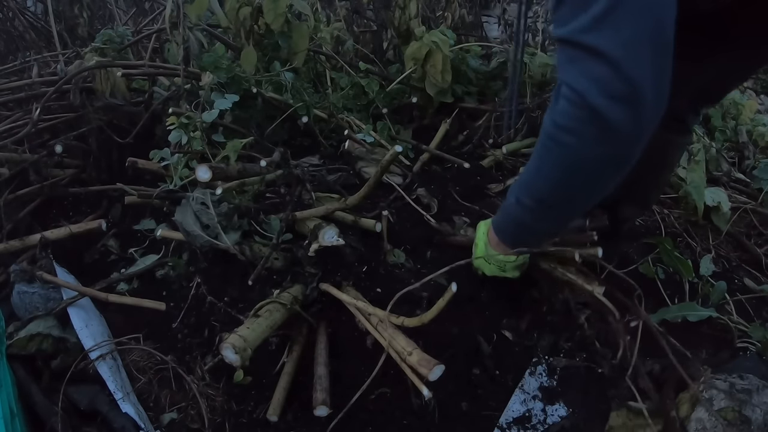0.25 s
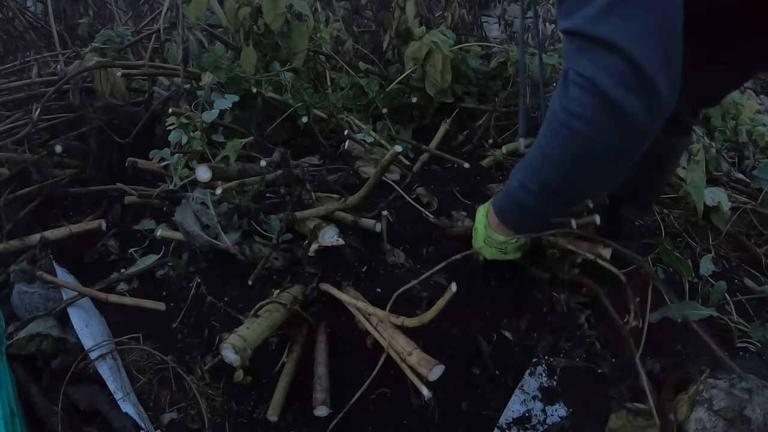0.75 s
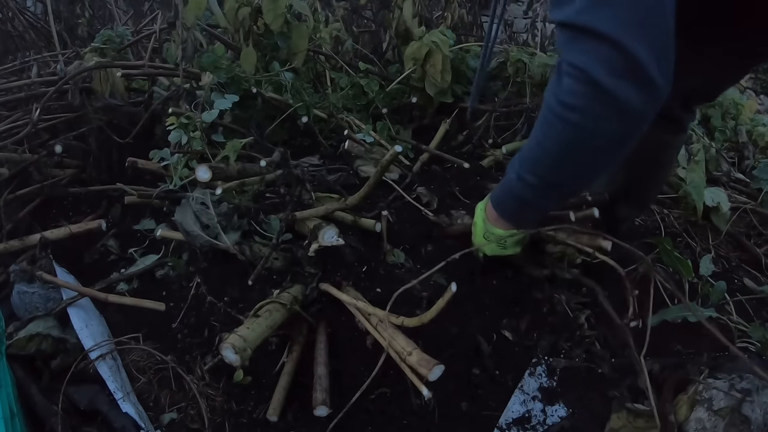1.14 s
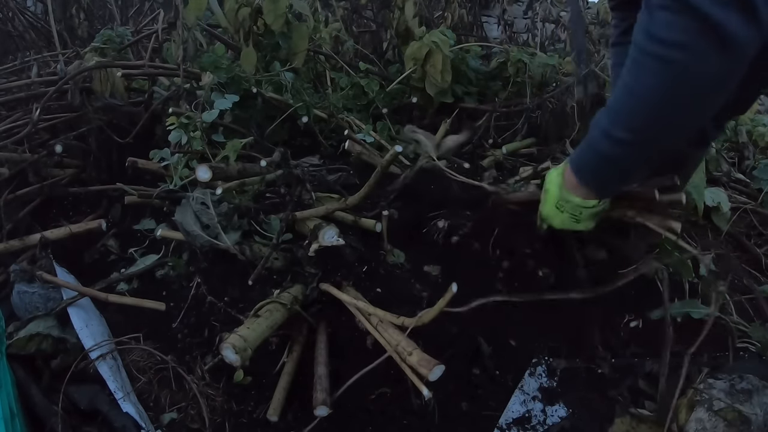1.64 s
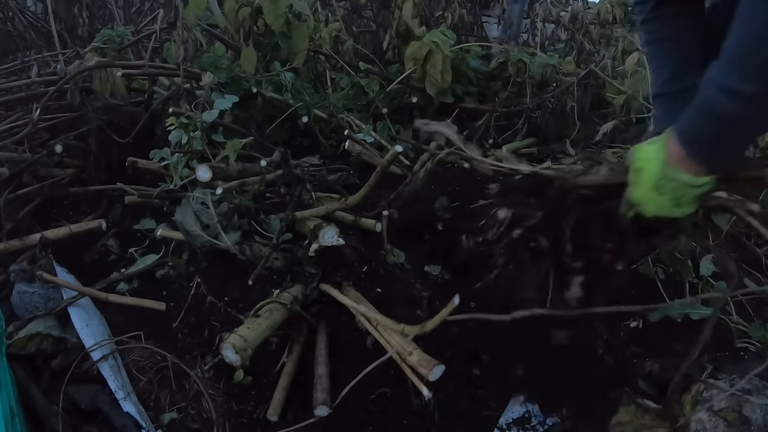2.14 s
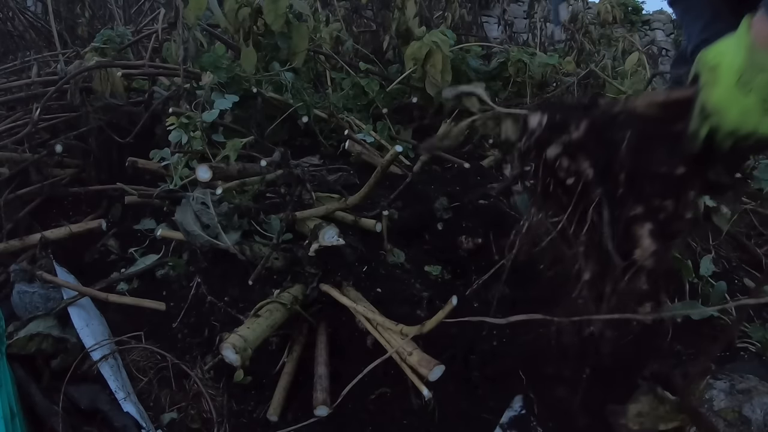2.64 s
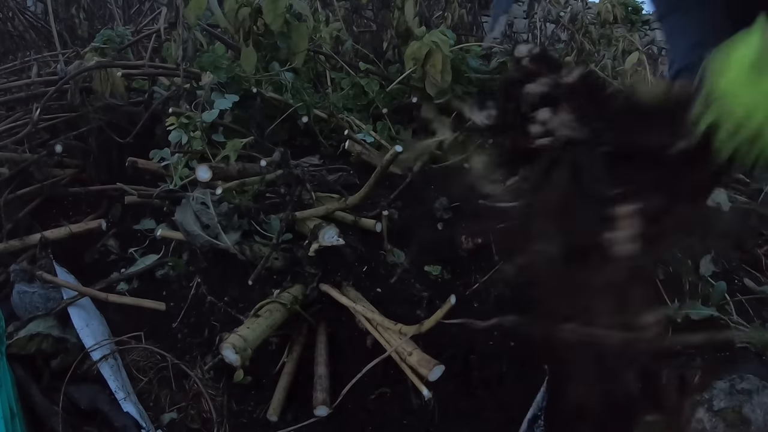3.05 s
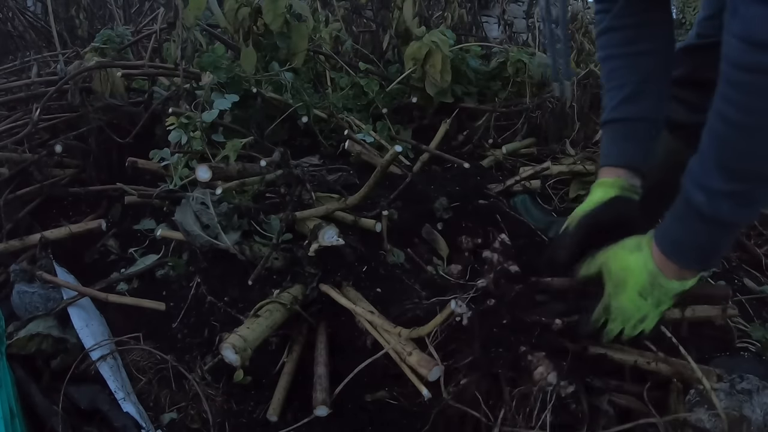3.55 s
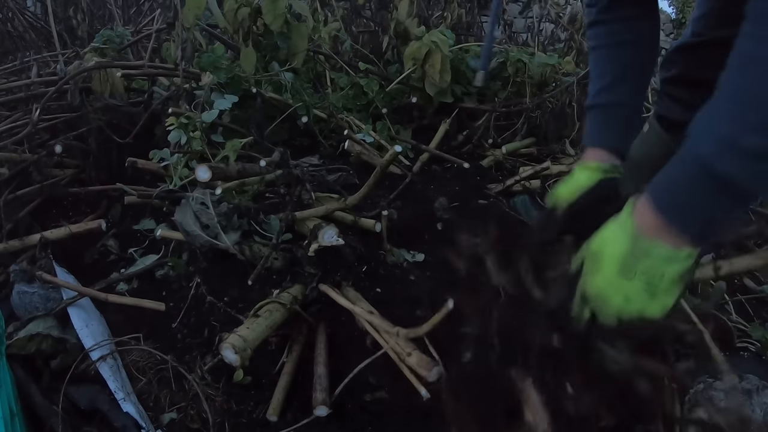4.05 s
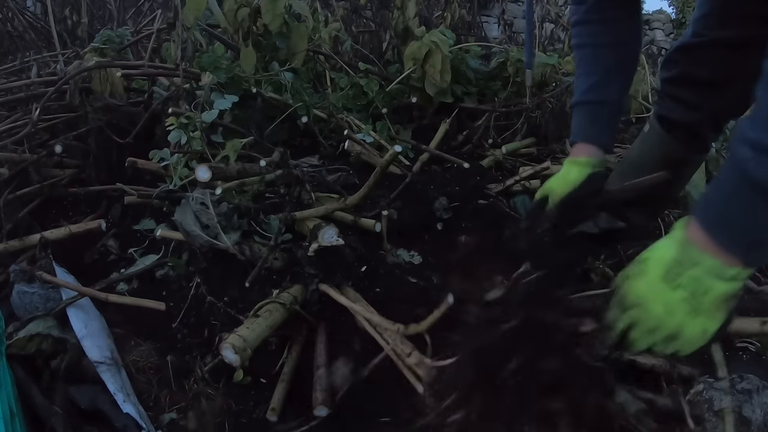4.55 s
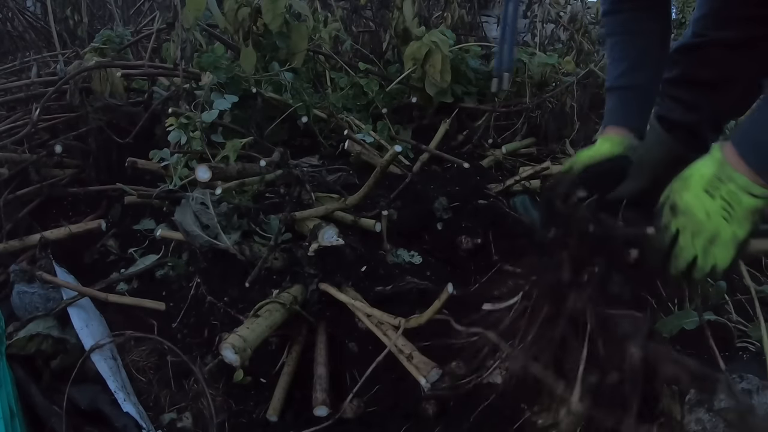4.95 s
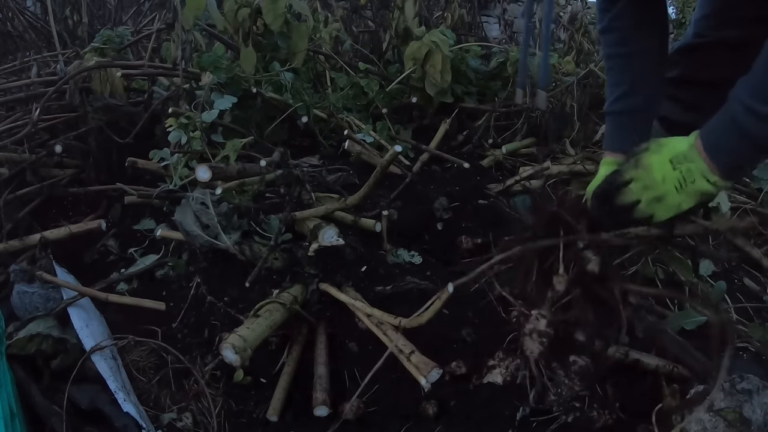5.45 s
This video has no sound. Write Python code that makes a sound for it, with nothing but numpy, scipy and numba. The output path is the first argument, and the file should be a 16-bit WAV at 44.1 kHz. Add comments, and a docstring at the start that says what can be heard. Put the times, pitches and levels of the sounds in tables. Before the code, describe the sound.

Close outdoor garden sound, almost mono. Gloved hands tug at dry stalks with small snaps and fine crackle, then harder cracks just after one second. One very sharp snap precedes a dense ripping of roots. After a short lull, the clump is shaken with rattling, crumbling soil and soft thuds, fading as a distant motor hum rises over light breeze and faint hiss.

```python
"""Gloved hands tug a clump of dry stalks, tear its roots from garden soil and shake the earth off.
Small snaps and crackle come first, hard cracks near 1.3 s, the sharpest at 2.8 s, a dense tear near 3.2 s;
after a lull the shaking rattles from 4.2 s, then fades while a far motor swells from 5 s. Light breeze, hiss.
Breaks are kicked resonances with noise tails, the motor is a sum of sines, air and breeze are filtered noise.
The microphone is close and almost mono."""
import sys
import numpy as np
from scipy import signal
from scipy.io import wavfile
from scipy.ndimage import uniform_filter1d
from numba import njit

SR = 44100
rng = np.random.default_rng(int(sys.argv[2]) if len(sys.argv) > 2 else 0)


def persist_wave(psi):
    """Save psi, clipped to +-1, as 16-bit WAV."""
    counts = np.round(np.clip(psi, -1, 1) * 32767).astype(np.int16)
    wavfile.write(sys.argv[1], SR, np.atleast_2d(counts).T)


N = 250929


def undb(db):
    """Amplitude factor of a level in dB."""
    return 10 ** (np.asarray(db) / 20)


def level(x, rms_db):
    """Scale x to an RMS level."""
    return x * undb(rms_db) / np.sqrt(np.mean(x ** 2))


def curve(table):
    """Interpolate each column of a table over time."""
    time_s, *columns = np.transpose(table)
    return [np.interp(np.arange(N) / SR, time_s, c) for c in columns]


def band(x, lo_hz, hi_hz):
    """Second-order Butterworth band-pass."""
    return signal.sosfilt(signal.butter(2, [lo_hz, hi_hz], "bandpass", fs=SR, output="sos"), x)


def walk(rate_hz):
    """Random levels held 1 / rate_hz s and slewed twice; spread near 1."""
    hold = int(SR / rate_hz)
    steps = np.repeat(rng.standard_normal(N // hold + 1), hold)
    slewed = uniform_filter1d(uniform_filter1d(steps, hold), hold)
    return 1.35 * slewed[:N]


@njit
def bursts(noise, start, hz, damp, tail_s, tail, peak):
    """A kick and a dying noise spray through two damped band-pass resonances, scaled to its peak."""
    out, burst = np.zeros(len(noise)), np.empty(4096)
    for e in range(len(start)):
        g = np.tan(np.pi * hz[e] / SR)
        scale = 1 + g * (g + damp)
        fall = np.exp(-np.log(1000.) / (tail_s[e] * SR))  # -60 dB in tail_s
        n = min(4096, int(tail_s[e] * SR + 4 * SR / (hz[e] * damp)), len(noise) - start[e])
        # band and low states of the two filters
        band1, low1, band2, low2 = 0., 0., 0., 0.
        spray, top = tail, 1e-9
        for i in range(n):
            x = spray * noise[start[e] + i] + (1. if i == 0 else 0.)
            v = (band1 + g * (x - low1)) / scale
            w = (band2 + g * (v - low2)) / scale
            band1, low1 = 2 * v - band1, low1 + 2 * g * v
            band2, low2 = 2 * w - band2, low2 + 2 * g * w
            spray *= fall
            burst[i] = w
            top = max(top, abs(w))
        for i in range(n):
            out[start[e] + i] += burst[i] * peak[e] / top
    return out


def strike(time_s, hz, damp, tail_s, tail, peak_db):
    """Breaks at time_s; damp = 1 / Q of each resonance, tail = spray amplitude against the kick."""
    time_s = np.asarray(time_s)
    tail_s = np.clip(tail_s + 0 * time_s, .001, .08)
    start = np.clip(time_s * SR, 0, N - 1).astype(np.int64)
    hz = np.clip(hz + 0 * time_s, 40, 15000)
    peak = undb(peak_db + 0 * time_s)
    return bursts(rng.standard_normal(N), start, hz, 1. * damp, tail_s, 1. * tail, peak)


# spectrum of the hiss: (frequency [Hz], relative density [dB per Hz])
AIR_SPECTRUM = [(47, -31), (80, 0), (130, 2.5), (178, -7), (361, -13.5), (802, -11), (1020, -16),
                (2380, -18), (10700, -29), (16000, -30)]
AIR_RMS_DB = -63


def air():
    """Distant hiss: half-octave noise bands, each flickering a little."""
    out = 0
    table_hz, table_db = np.transpose(AIR_SPECTRUM)
    for hz in 88 * 2 ** np.arange(0, 7.6, .5):
        db = np.interp(np.log(hz), np.log(table_hz), table_db) + 1.2 * walk(6)
        noise = band(rng.standard_normal(N), hz / 2 ** .25, hz * 2 ** .25)
        out = out + undb(db) * noise
    return level(out, AIR_RMS_DB)


# breeze on the microphone: (time [s], level [dB])
BREEZE_LEVEL = [(0.0, -55), (1.06, -57.5), (1.39, -52), (2.59, -60), (3.26, -50), (3.48, -58.5),
                (4.49, -53), (4.86, -56), (5.69, -57.5)]


def breeze():
    """Low buffeting of moving air: low-band noise with a wandering level."""
    gusts = band(band(rng.standard_normal(N), 26.6, 143), 23.5, 83)
    gust_db = curve(BREEZE_LEVEL)[0] + 0.99 * walk(9.9)
    return undb(gust_db) * level(gusts, 0)


# far motor: (time [s], firing rate [Hz], level [dB])
MOTOR_RUN = [(0, 118, -65), (1.2, 116.3, -77), (4.9, 116.5, -69), (5.15, 112.6, -58), (5.4, 114.7, -59),
             (5.69, 119.7, -58)]
# its partials: (multiple of firing rate [1], relative level [dB])
MOTOR_PARTIALS = [(1, -2), (5.5, -13), (9, -10.5), (12, -16), (14.5, -18.5), (21, -16), (26, -29)]


def motor():
    """Wavering firing tone with a few thin overtones."""
    hz, db = curve(MOTOR_RUN)
    phase = 2 * np.pi * np.cumsum(hz * (1 + 0.00555 * walk(3.8))) / SR
    tone = sum(undb(d + 2.0 * walk(9)) * np.sin(k * phase) for k, d in MOTOR_PARTIALS)
    return undb(db) * tone


# clods and root ball on the ground: (time [s], peak before band-pass [dB], pitch [Hz])
CLOD_THUDS = [(0.35, -38, 414), (0.399, -34, 650), (0.423, -37.5, 610), (0.61, -33, 515),
              (0.713, -36.5, 206), (1.059, -43, 387), (1.133, -40.5, 237), (1.195, -41.5, 350),
              (1.278, -33.5, 196), (1.36, -34, 145), (1.397, -35.5, 228), (1.852, -37.5, 294),
              (2.195, -33, 460), (2.318, -28, 534), (2.742, -32.5, 487), (2.922, -35.5, 101),
              (3.003, -31.5, 175), (3.137, -23.5, 397), (3.177, -34, 119), (3.232, -33, 171),
              (3.266, -33.5, 138), (3.639, -48, 450), (3.8, -35.5, 565), (4.216, -33, 146),
              (4.428, -29, 740), (4.487, -28, 230), (4.546, -36.5, 360), (4.69, -22.5, 694),
              (4.7, -26, 420), (4.88, -33.5, 400), (4.955, -29, 370)]


def thuds():
    """Soft blows on loose earth: one or two clean low cycles."""
    time_s, peak_db, hz = np.transpose(CLOD_THUDS)
    blows = strike(time_s, hz, 1.0, 0.035, 0.029, peak_db)
    return band(blows, 46, 1300)


def grit(db, count, hz, octaves, damp, tail_s, scatter_db, full_db, clump_db):
    """Tiny breaks, fewer below full_db; scatter_db > 0 lifts a few grains, < 0 sinks a few."""
    when, tone, size, keep = rng.random((count, 4)).T
    share = np.clip(undb(.8 * (db - full_db)), .06, 1)
    here = share[(when * N).astype(int)]
    size_db = np.where(keep < here, -scatter_db * np.log(1 - size), -60)
    pitch_hz = hz * 2 ** (octaves * (2 * tone - 1))
    grains = strike(when * N / SR, pitch_hz, damp, tail_s, 0.25, size_db)
    return undb(db) * level(grains * undb(clump_db) / np.sqrt(share), 0)


# the tug, also drives the twigs: (time [s], fibre crackle level [dB], dry leaf level [dB])
TUG_EFFORT = [(0.0, -61, -70), (0.18, -67.5, -75), (0.37, -56.5, -62), (0.53, -66, -75), (0.64, -58, -75),
              (0.95, -65, -73), (1.28, -55.5, -74), (1.4, -44, -54), (1.65, -47.5, -61.5), (1.92, -51, -68),
              (2.08, -64.5, -63.5), (2.3, -49, -58), (2.47, -55.5, -67), (2.74, -47.5, -57),
              (2.83, -49.5, -61), (2.98, -43, -53), (3.11, -46.5, -65), (3.22, -39, -44),
              (3.33, -46.5, -48.5), (3.47, -66, -61.5), (3.6, -56.5, -64), (3.98, -58, -57.5),
              (4.21, -44.5, -48.5), (4.25, -44.5, -48), (4.285, -52.5, -53), (4.34, -45.5, -52.5),
              (4.42, -45.5, -50), (4.67, -41.5, -53.5), (4.87, -46, -62), (5.1, -58.5, -66),
              (5.69, -68, -70)]
# soil grows faster than the fibres: level at the pivot, dB per fibre dB, fibre level at the pivot
SOIL_DB, SOIL_GROWTH, SOIL_PIVOT_DB = -54.5, 1.06, -49.5
SHAKE_S, SHAKE_DB = 4.6, 3  # extra soil from the last shake on


def crackle():
    """Stalk fibres, crumbling soil and dry leaves, bunched by the same slips of the grip."""
    fibre_db, leaf_db = curve(TUG_EFFORT)
    shake_db = SHAKE_DB * (np.arange(N) > SHAKE_S * SR)
    soil_db = SOIL_DB + shake_db + SOIL_GROWTH * (fibre_db - SOIL_PIVOT_DB)
    slip = walk(90)
    fibres = grit(fibre_db, count=9000, hz=2200, octaves=1.33, damp=0.9, tail_s=0.0086,
                  scatter_db=1.68, full_db=-44.5, clump_db=1.5 * slip)
    soil = grit(soil_db, count=4000, hz=456, octaves=1.135, damp=1.0, tail_s=0.0092,
                scatter_db=-3.0, full_db=-53, clump_db=3.5 * slip)
    leaves = grit(leaf_db, count=12000, hz=6000, octaves=1.0, damp=1.3, tail_s=0.021,
                  scatter_db=1.0, full_db=-69.5, clump_db=1.6 * slip)
    return fibres + soil + leaves


TWIG_DB, TWIG_SCATTER_DB = 13, 1.5  # peak over the fibre crackle
TWIG_HZ, TWIG_CRACK_DB, TWIG_TAIL_S = 2200, -27, 0.0093  # centres of the random draws
TEAR_S, STRAIN_DB = 1.5, 6  # louder while the roots still hold
DOWN_S, REST_DB = 4.6, -8  # quieter once the clump is put down


def twigs(count):
    """Small twigs break at random, as loud as the tug allows; columns as in STALK_SNAPS."""
    when, size = rng.random((count, 2)).T
    pitch, bright, length = rng.standard_normal((count, 3)).T
    time_s = when * N / SR
    fibre_db = curve(TUG_EFFORT)[0][(when * N).astype(int)]
    stage_db = np.where(time_s < TEAR_S, STRAIN_DB, np.where(time_s > DOWN_S, REST_DB, 0))
    peak_db = fibre_db + TWIG_DB - TWIG_SCATTER_DB * np.log(1 - size) + stage_db
    hz = TWIG_HZ * 2 ** (0.49 * pitch)
    crack_db = TWIG_CRACK_DB + 6 * bright
    tail_s = TWIG_TAIL_S * 2 ** (0.3 * length)
    return np.array([time_s, peak_db, hz, crack_db, tail_s])


# loudest snaps of stalks and roots:
# (time [s], ring peak [dB], ring pitch [Hz], crack relative to ring [dB], ring splinter tail [s])
STALK_SNAPS = [(0.0184, -37, 3310, -14, 0.0044), (0.0441, -28.5, 1250, -16, 0.002),
               (0.0766, -36.5, 1370, -27, .004), (0.1337, -36.5, 3110, -22, 0.0061),
               (0.1573, -40.5, 2150, -1, .004), (0.169, -36.5, 1990, -14, 0.0087),
               (0.2186, -39.5, 2800, -23, 0.0097), (0.2395, -41, 1950, -21, 0.0097),
               (0.2919, -35.5, 1410, -10, 0.0043), (0.3208, -36.5, 2610, -6, 0.0081),
               (0.349, -33.5, 2160, -23, 0.0086), (0.4086, -29.5, 1560, -35, .009),
               (0.4402, -33, 3710, -13, 0.0048), (0.5658, -37.5, 3830, -13, 0.0049),
               (0.5831, -25, 2400, -33, 0.001), (0.6094, -30, 1850, -8, .003),
               (0.622, -26.5, 1700, -23, 0.0048), (0.6284, -34, 2980, -9, 0.004),
               (0.689, -33, 3370, -20, 0.0039), (0.6962, -33.5, 3580, -25, 0.0071),
               (0.7094, -29.5, 2370, -22, 0.011), (0.7192, -28, 1680, -22, 0.002),
               (0.7519, -36, 3080, -23, 0.0039), (0.759, -25, 2420, -10, 0.0029),
               (0.778, -34, 1970, -23, 0.005), (0.7892, -33, 2550, -15, 0.0062),
               (0.7964, -32.5, 1360, -19, 0.0068), (0.8403, -30.5, 2220, -28, 0.0039),
               (0.863, -31.5, 2020, -32, .004), (0.881, -40.5, 4500, -14, 0.0028),
               (0.927, -31, 2540, -20, 0.0042), (1.0001, -30.5, 2280, -36, 0.0062),
               (1.021, -35, 3200, -24, 0.0057), (1.0599, -40, 1920, -18, 0.0032),
               (1.0793, -37, 2550, -19, 0.0033), (1.099, -34.5, 1430, -25, 0.0085),
               (1.1241, -23, 5060, -27, .004), (1.1302, -27, 1450, -9, 0.015),
               (1.184, -34, 1410, -29, 0.006), (1.1925, -26, 1680, -35, 0.0029),
               (1.2149, -39, 2320, -14, .004), (1.2317, -27.5, 2260, -22, 0.0016),
               (1.275, -14, 2500, -38, 0.0017), (1.3189, -33, 2500, -2, 0.0053),
               (1.324, -26, 1300, -29, .0076), (1.3526, -12.5, 2800, -8, 0.0033),
               (1.3607, -17.5, 2350, -13, 0.016), (1.381, -25, 3710, -23, 0.0036),
               (1.39, -26, 1810, -16, 0.0054), (1.397, -19.5, 1960, -6, 0.012),
               (1.4194, -16.5, 2870, -2, 0.0038), (1.4342, -36.5, 2240, 15, 0.01),
               (1.4427, -23, 1380, -21, 0.0066), (1.4495, -22.5, 2300, -3, 0.004),
               (1.4698, -24, 2860, -21, 0.0029), (1.545, -30, 2140, -10, .012),
               (1.5902, -27, 1560, -12, 0.0019), (1.6093, -27.5, 1497, -26, 0.0075),
               (1.6649, -27.5, 3060, -11, .005), (1.7003, -43, 3060, -19, 0.0029),
               (1.765, -26, 2170, -25, .006), (1.792, -26.5, 3500, -3, 0.016),
               (1.8116, -35.5, 4500, -2, .006), (1.8507, -24.5, 1900, -15, 0.0057),
               (1.911, -32, 1580, -10, 0.0044), (1.967, -28, 2380, -8.5, 0.0068),
               (1.9894, -26, 2310, -8, 0.0041), (2.0067, -28.5, 2300, -36, 0.00087),
               (2.0519, -36.5, 4800, 2.5, 0.013), (2.1773, -38.5, 4150, 1.5, 0.0092),
               (2.238, -32, 3740, -27, 0.011), (2.3194, -35, 1660, -19, 0.013),
               (2.3538, -27, 1980, -20, 0.0059), (2.4407, -35.5, 3410, -24, 0.0042),
               (2.543, -38.5, 4800, 2, 0.017), (2.576, -34, 1640, -24, .012),
               (2.5984, -39, 1690, -14, .003), (2.6204, -36, 1800, -16, .009),
               (2.6789, -36, 3400, -10, .0055), (2.7431, -25.5, 1900, -6, 0.011),
               (2.7655, -4.5, 3960, -8, 0.0027), (2.8104, -29, 1650, -25, 0.0044),
               (2.826, -28.5, 2170, -7, .01), (2.8537, -31, 3460, -19, 0.005),
               (2.865, -32, 2410, -10, 0.019), (2.894, -28.5, 3600, -5, 0.013),
               (2.9325, -30.5, 1450, -27, 0.0093), (2.9828, -23, 1830, -11, 0.012),
               (2.995, -30, 1920, -15, 0.026), (3.0288, -29.5, 1200, -20, 0.0067),
               (3.048, -29.5, 1090, -22, .006), (3.1141, -34, 1470, -24, .005),
               (3.1384, -23, 1650, -13.5, 0.053), (3.1526, -21.5, 2930, -25, 0.0086),
               (3.1744, -20, 2700, -14, 0.033), (3.219, -20, 3520, -15, 0.016),
               (3.246, -23.5, 2200, -16, 0.028), (3.3257, -25.5, 4110, -12, 0.0049),
               (3.3428, -25, 2380, -10, 0.0018), (3.388, -33, 1900, -18, 0.0036),
               (3.4467, -41, 1820, -25, 0.012), (3.6387, -36.5, 1780, -15, 0.0077),
               (3.6716, -39, 2970, -14, 0.0027), (3.688, -43.5, 1200, -16, .008),
               (3.7753, -35, 2000, -13, 0.0091), (3.8701, -40, 1950, -6, .012),
               (4.0303, -27.5, 3430, -5, 0.0056), (4.1674, -28.5, 2200, -21, 0.02),
               (4.2154, -21, 2030, -2.5, 0.011), (4.229, -25, 3420, -9, 0.02), (4.242, -30, 3120, 1, .0075),
               (4.3402, -27, 2240, -27, 0.0069), (4.3737, -35, 3160, 8, 0.043),
               (4.412, -23, 2110, -13, 0.0055), (4.4414, -28, 3390, -17, .01),
               (4.4288, -22, 1500, -14, 0.011), (4.5142, -24.5, 3130, -35, 0.005),
               (4.5516, -25.5, 3580, 2, 0.017), (4.6422, -23.5, 1390, -23, 0.004),
               (4.6822, -22.5, 2390, -8, 0.0079), (4.7084, -24.5, 2140, -3, 0.0083),
               (4.7699, -18, 4000, -5.5, 0.015), (4.8299, -29, 1800, -22, .004),
               (4.9115, -36, 2050, -18, 0.0022), (4.965, -30.5, 1650, -25, .005),
               (5.031, -37, 1360, -20, .007), (5.1677, -30.5, 2140, -30, 0.0082),
               (5.212, -39.5, 1100, -19, 0.014), (5.2681, -36, 4560, 2.5, 0.013),
               (5.4264, -43.5, 2620, -15, 0.016), (5.6569, -31, 9100, -5.5, 0.028)]
# woody body relative to the ring at TWIG_HZ; low-ringing thick stalks carry more
BODY_DB, BODY_DB_PER_OCTAVE, BODY_SCATTER_DB = -14.5, -5, 2.5
# hardest snaps are thin and dry: body dB lost per dB of peak above the knee
DRY_KNEE_DB, DRY_SLOPE = -11, 1


def snaps():
    """A stalk rings with a hollow side mode, woody body and bright crack, then sheds crumbs."""
    time_s, db, hz, crack_db, tail_s = np.hstack([np.transpose(STALK_SNAPS), twigs(count=90)])
    chance = rng.standard_normal((len(time_s), 5)).T
    spread = 2 ** (0.27 * chance)
    body_db = BODY_DB + BODY_DB_PER_OCTAVE * np.log2(hz / TWIG_HZ) + BODY_SCATTER_DB * chance[4]
    body_db = body_db - DRY_SLOPE * np.clip(db - DRY_KNEE_DB, 0, None)
    ring = strike(time_s, hz, 1.0, tail_s, 0.48, db)
    hollow = strike(time_s, 0.796 * hz * spread[3], 0.16, tail_s, 0.094, db - 20.5)
    body = strike(time_s, 560 * spread[0], 0.99, 3.9 * tail_s, 0.26, db + body_db)
    crack = strike(time_s, 6900 * spread[1] ** .5, 1.0, 1.6 * tail_s, 0.24, db + crack_db)
    crumbs = strike(time_s + 0.0023, 3000 * spread[2], 2.5, 12.0 * tail_s, 3.0, db - 16.5)
    # damp fibre swallows the top of ring, hollow and crumbs
    return band(ring + hollow + crumbs, 440, 9100) + body + crack


def scene():
    """Sum the sources; the channels differ in short spells, mostly in the treble."""
    mid = snaps() + thuds() + crackle() + motor() + breeze() + air()
    treble = band(band(mid, 5700, 16000), 6200, 16000) * walk(900)
    spells = undb(-30 * np.clip(.6 - 1.95 * walk(25), 0, 1))
    delayed = np.roll(mid, shift=331)  # samples
    side = spells * (undb(-7) * treble + undb(-30.5) * delayed)
    return np.array([mid + side, mid - side])


TOP_HZ = 15900


def record(dry):
    """The recorder cuts the top: steep elliptic low-pass at TOP_HZ."""
    return signal.sosfilt(signal.ellip(10, .2, 70, TOP_HZ, fs=SR, output="sos"), dry)


dry = scene()
out = record(dry)
persist_wave(out)
```